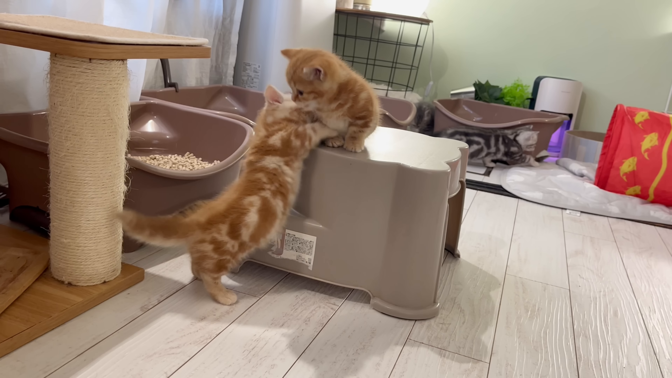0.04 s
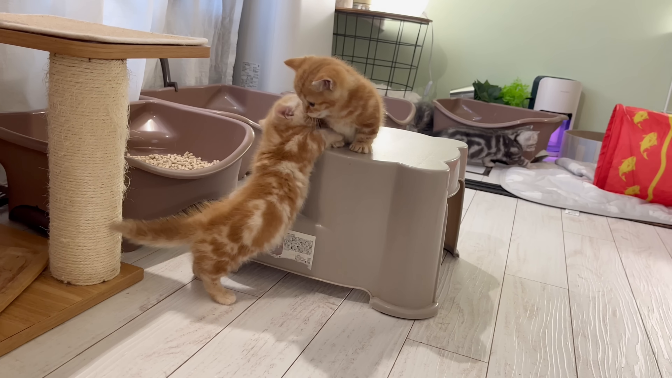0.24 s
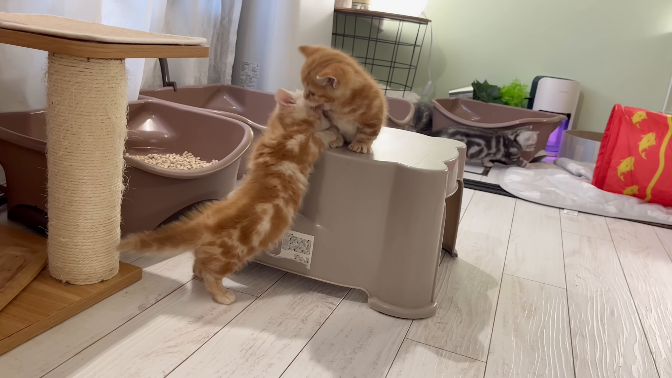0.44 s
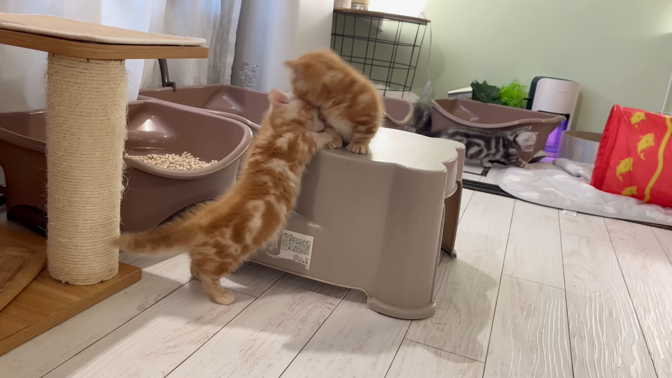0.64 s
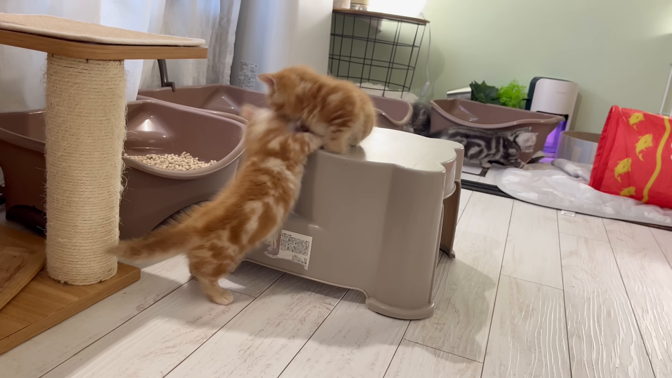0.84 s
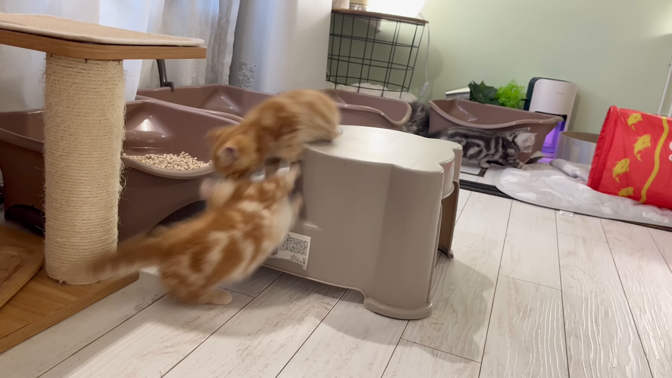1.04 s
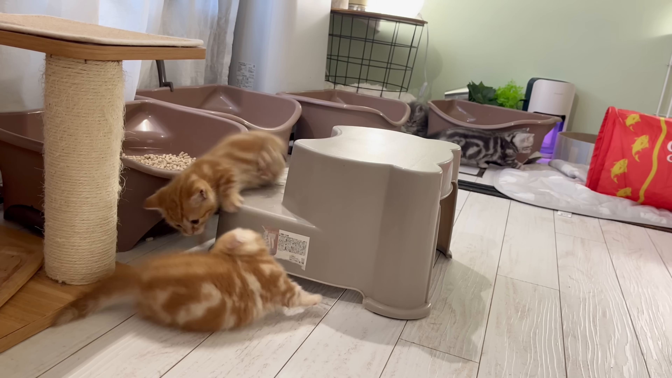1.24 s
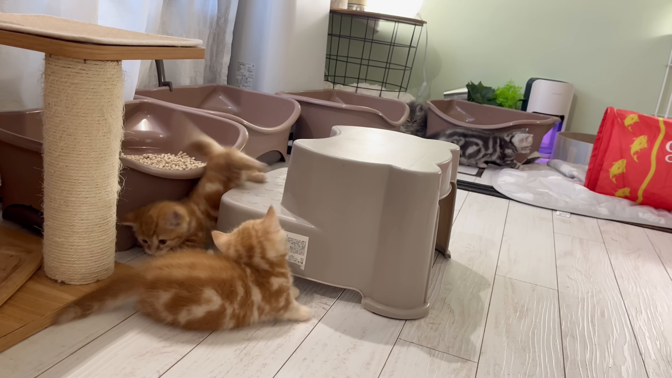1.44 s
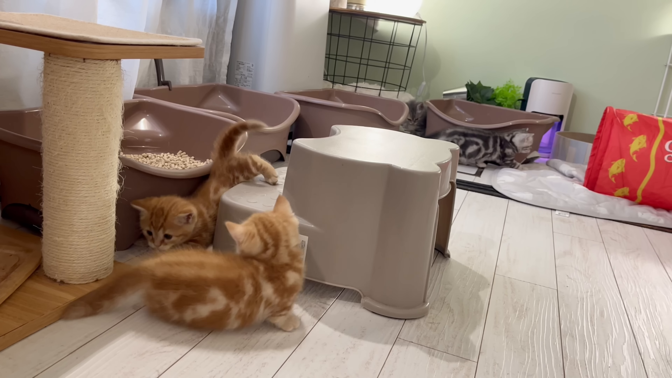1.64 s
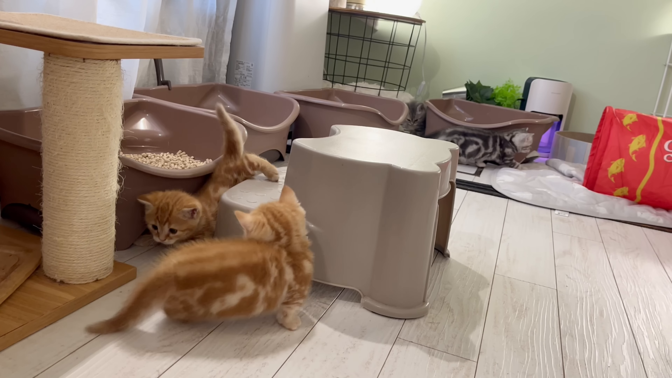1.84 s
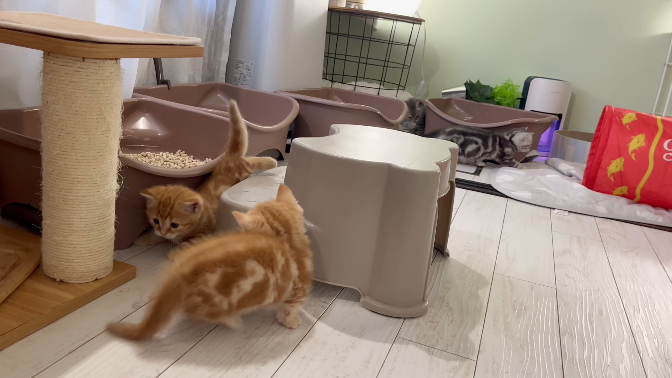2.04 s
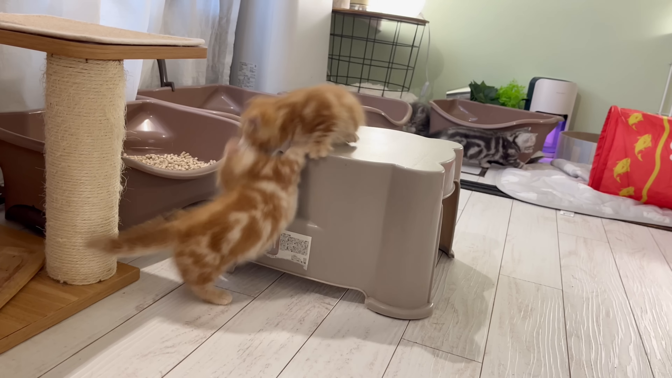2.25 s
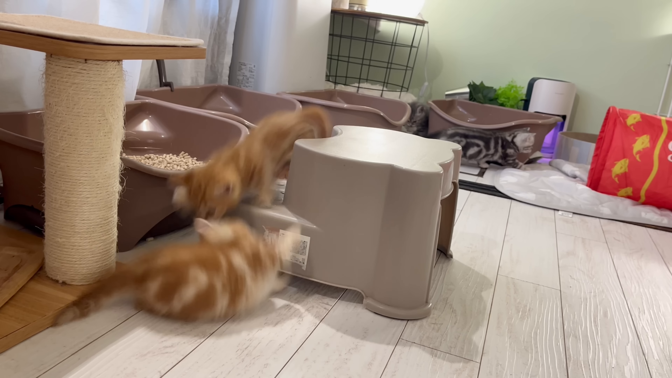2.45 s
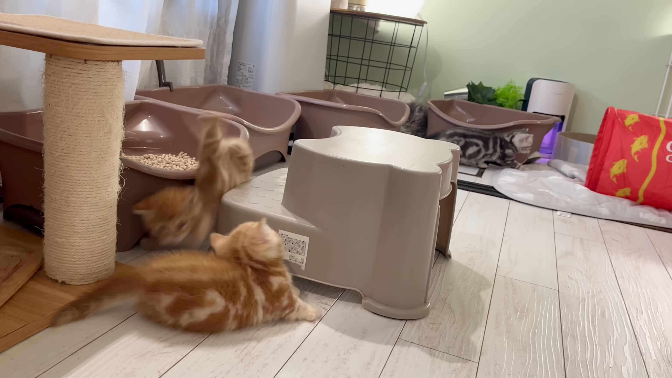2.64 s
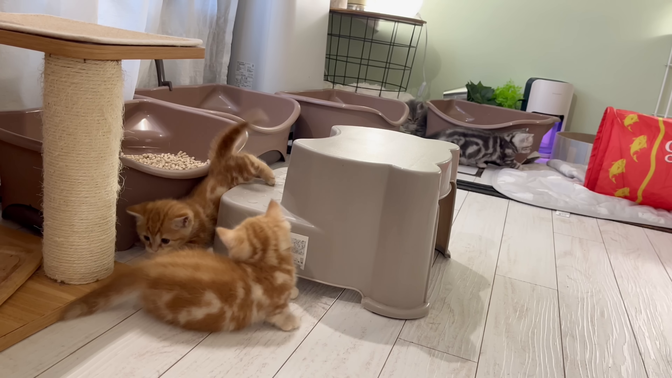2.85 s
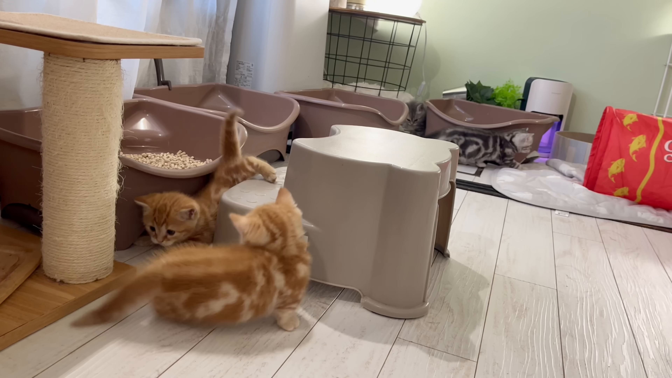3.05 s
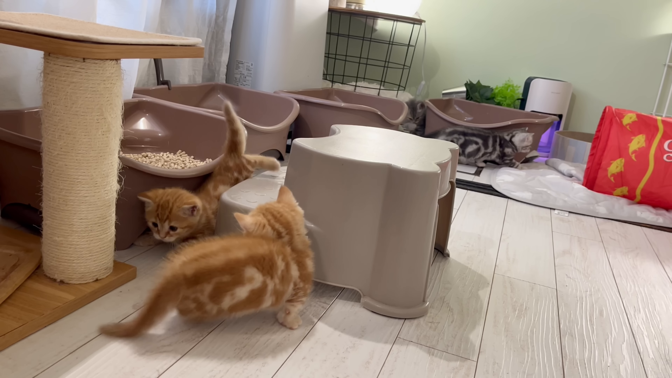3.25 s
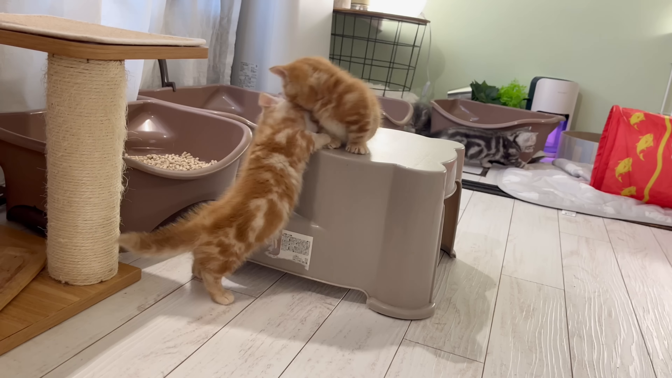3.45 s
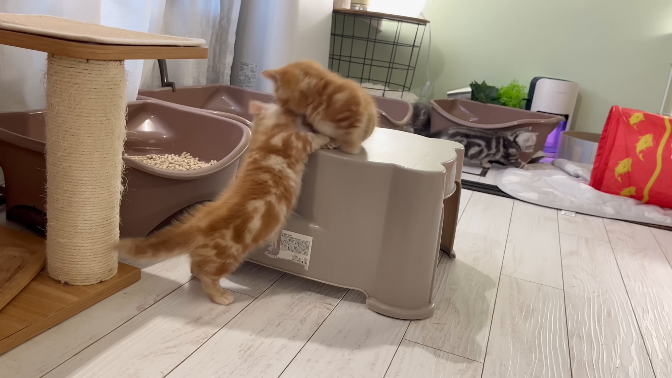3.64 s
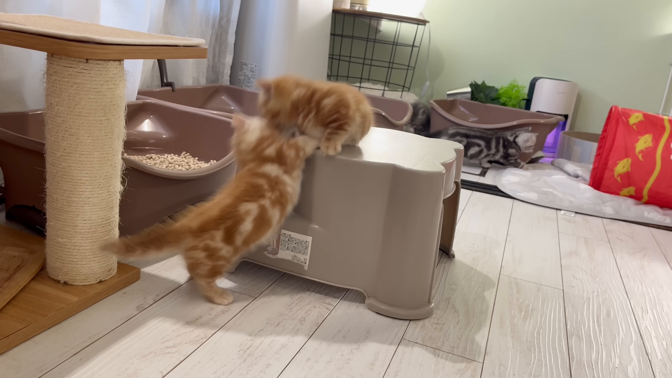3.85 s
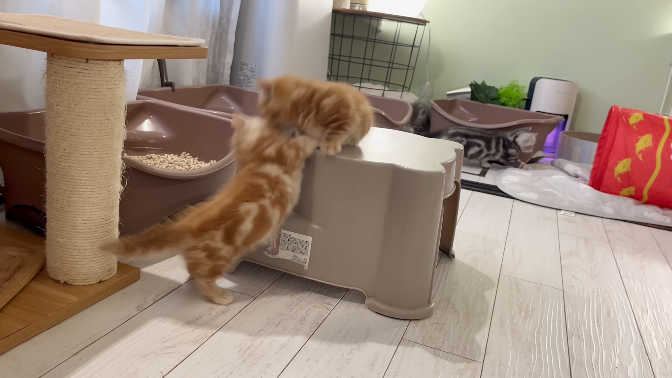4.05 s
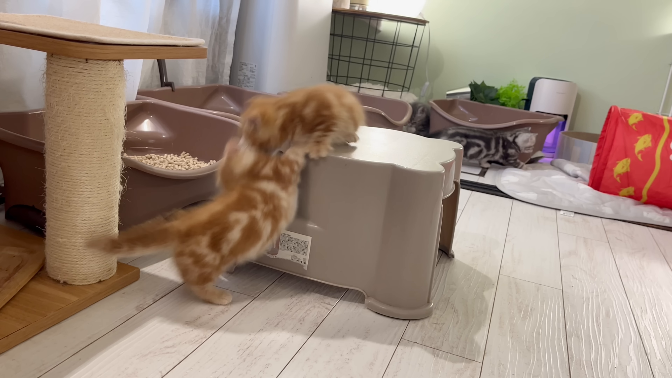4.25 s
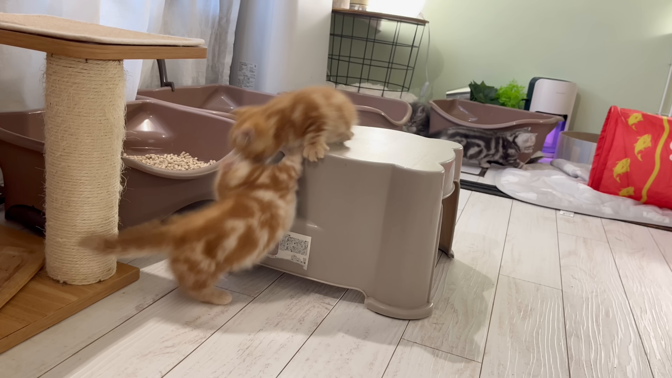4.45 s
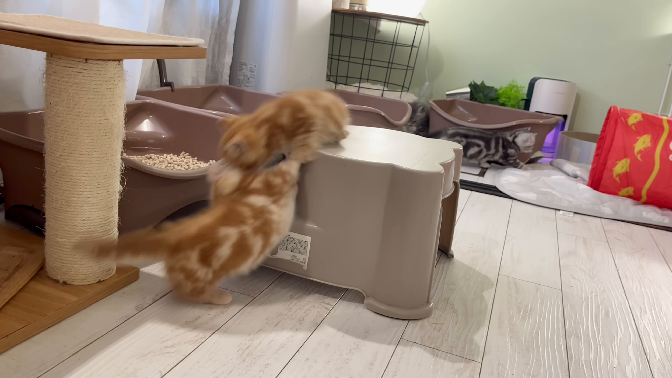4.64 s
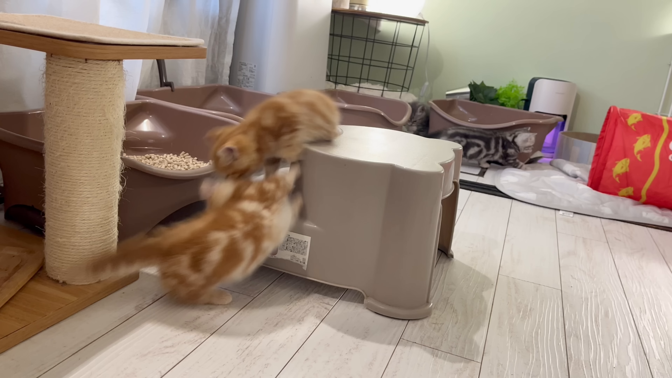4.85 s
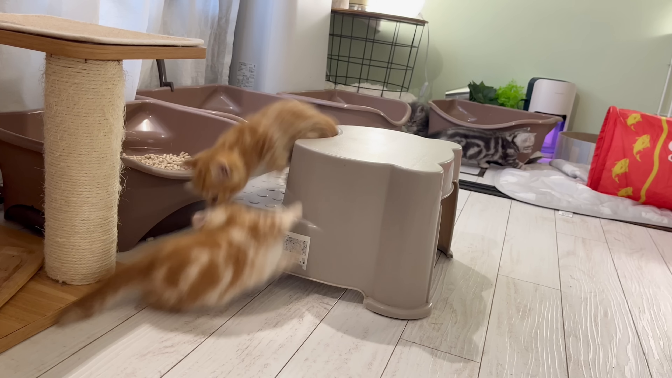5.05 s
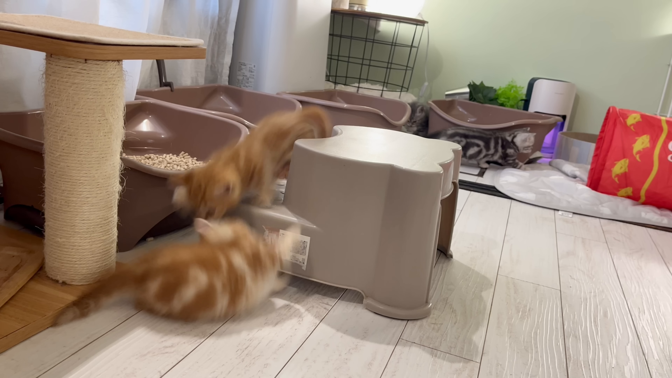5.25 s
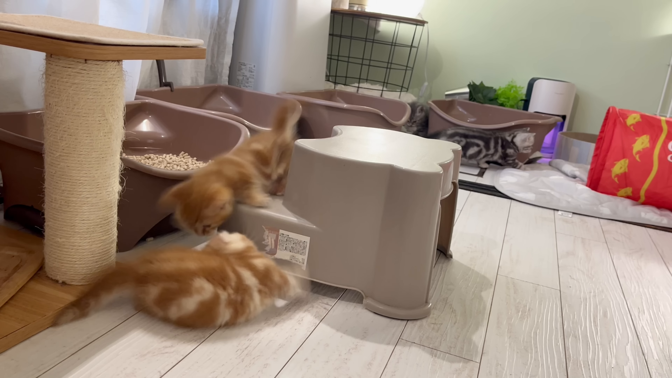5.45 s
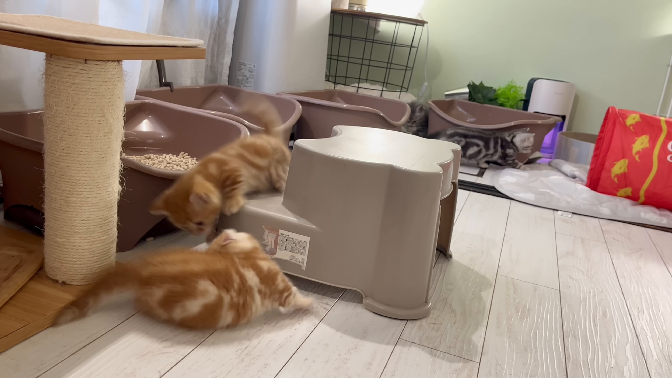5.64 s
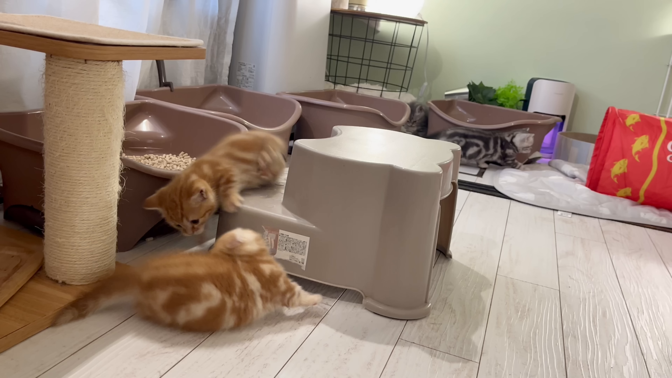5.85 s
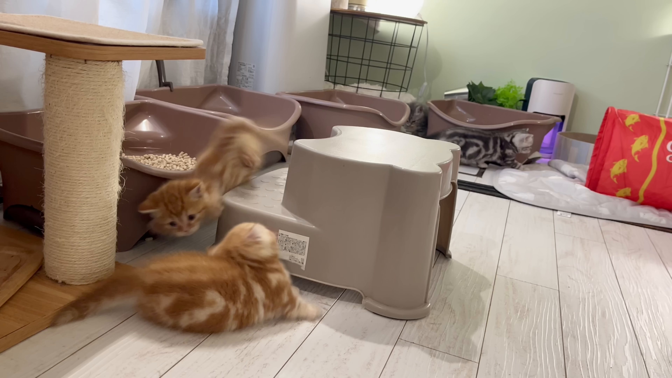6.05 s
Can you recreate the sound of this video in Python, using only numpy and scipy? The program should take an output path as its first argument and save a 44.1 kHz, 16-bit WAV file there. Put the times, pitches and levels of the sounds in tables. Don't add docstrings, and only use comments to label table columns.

```python
import sys
import numpy as np
from scipy import signal
from scipy.fft import rfft, irfft
from scipy.io import wavfile
from scipy.ndimage import uniform_filter1d

SR = 44100
rng = np.random.default_rng(int(sys.argv[2]) if len(sys.argv) > 2 else 0)


def ratio_of_db(decibels):
    return 10 ** (np.asarray(decibels, float) / 20)


def waveform_to_disk(signal):
    frames = np.transpose(np.atleast_2d(signal))
    scaled = np.clip(frames, -1, 1) * 32767
    samples = np.round(scaled).astype(np.int16)
    wavfile.write(sys.argv[1], SR, samples)


N = 269451
M = int(2.2 * SR)
TIME = np.arange(M) / SR
FREQ = np.maximum(np.fft.rfftfreq(M, 1 / SR), 1)


def along(table):
    hz, value = np.transpose(table)
    return np.interp(np.log(FREQ), np.log(np.maximum(hz, 1)), value)


def colour(x, gain):
    return irfft(rfft(x, M) * gain, M)


def unit(x):
    return x / np.sqrt(np.mean(x ** 2))


def swell(start_s, rise_s, t60_s):
    t = np.maximum(TIME - start_s, 0)
    return (1 - np.exp(-2 * t / abs(rise_s))) * 1000. ** (-t / abs(t60_s))


def ring(start_s, hz, rise_s, t60_s):
    return swell(start_s, rise_s, t60_s) * np.sin(2 * np.pi * hz * (TIME - start_s))


def walk(rate):
    k = int(SR / rate)
    return unit(uniform_filter1d(uniform_filter1d(rng.standard_normal(M), k), k))


def air():
    # pitch_hz, level_db (per Hz)
    tone = [(20, -15), (65, 4), (180, -5), (300, -4.5), (590, -4), (800, -10), (1400, -12.5), (2100, -15),
            (2400, -22), (3300, -25), (4800, -55), (7000, -48), (13000, -54), (16000, -72)]
    # pitch_hz, level_db
    side_tone = [(60, -12.5), (300, -11.5), (800, -0.5), (3000, -1.5), (8000, 4), (15000, -33)]
    mid, side = rng.standard_normal((2, M))
    shape = ratio_of_db(along(tone))
    mid = colour(mid, shape)
    side = colour(side, shape * ratio_of_db(along(side_tone)))
    flicker = ratio_of_db(-60 + .5 * walk(7.6))
    return flicker * (mid + side * np.array([[1], [-1]])) / np.std(mid)


def shuffle():
    # time_s, rumble_db
    effort = [(0.0, -82), (.47, -68.5), (.59, -58.5), (.74, -62.5), (.92, -56.5), (1.2, -50), (1.33, -57),
              (1.4, -50), (1.53, -62), (2.12, -90)]
    # pitch_hz, width_hz, level_db
    board_modes = [(45.2, 13, -7.5), (66, 20.2, -5.5), (92, 35, 0.5), (135, 15, -12), (184.4, 65, -10.5),
                   (255, 39, -11), (328, 130, -16)]
    # pitch_hz, level_db
    slide = [(500, 9.5), (1200, 9), (2500, 1), (4500, 1), (7000, -13.5), (12000, -8.5), (16000, -5.5)]
    rest_db, top_db, growth = -78.5, -60, 2.5
    effort_db = np.interp(TIME, *np.transpose(effort))
    boards = sum(ratio_of_db(db) / (1 + (2 * (FREQ - hz) / width) ** 2) for hz, width, db in board_modes)
    rumble = unit(colour(rng.standard_normal(M), boards)) * ratio_of_db(effort_db + 1.1 * walk(33))
    hiss_level = ratio_of_db(rest_db) + ratio_of_db(top_db + growth * (effort_db - effort_db.max()))
    hiss = unit(colour(rng.standard_normal(M), ratio_of_db(along(slide))))
    return rumble + hiss * hiss_level * ratio_of_db(2.5 * walk(39))


def paws():
    # start_s, peak_db, pitch_hz
    taps = [(.168, -59, 430), (.53, -52, 700), (.768, -52, 590), (.862, -48, 260), (.902, -43.5, 320),
            (.94, -40, 788), (.98, -36, 265), (1.03, -49, 255), (1.119, -57, 361), (1.157, -32, 350),
            (1.159, -37.5, 640), (1.205, -34.5, 885), (1.24, -44, 260), (1.2925, -33, 790),
            (1.294, -41, 660), (1.3, -43, 285), (1.378, -38.5, 795), (1.405, -32.5, 820),
            (1.42, -42.5, 700), (1.485, -44.5, 557), (1.589, -44.5, 494)]
    # start_s, peak_db, pitch_hz, t60_s
    thumps = [(.137, -48.5, 106, .072), (.39, -46, 66.5, .095), (.562, -50, 135, .15),
              (.62, -48.5, 155, .27), (.7, -50, 70, .1), (.758, -54, 68, .15), (.837, -48, 68.4, .32),
              (.894, -44, 69.4, .17), (.987, -39.5, 92, 0.12), (.999, -39, 62.6, .13),
              (1.099, -52, 75.5, 0.19), (1.189, -18, 82, 0.082), (1.198, -25, 66, .22),
              (1.214, -20, 125.8, .06), (1.224, -36, 193, .12), (1.262, -34.5, 85, 0.34),
              (1.395, -36, 100, .12), (1.417, -32, 110, .074), (1.436, -36, 200, .07), (1.44, -33, 105, .1),
              (1.46, -32, 72, .15), (1.508, -44, 100, 0.14), (1.621, -47.5, 82, .072)]
    out = 0
    for s, db, hz in taps:
        t60 = .008 + 6.5 / hz
        wall = ring(s, hz, 0.92 / hz, t60)
        neighbour = .5 * ring(s, 1.37 * hz, 0.0013, 0.46 * t60)
        overtone = 0.14 * ring(s, 2.2 * hz, 0.0032, 0.86 * t60)
        out = out + ratio_of_db(db) * (wall + neighbour + overtone)
    for s, db, hz, t60 in thumps:
        out = out + ratio_of_db(db) * ring(s, hz, .7 / hz, t60)
    return out


def shell(push, damping, ring_db):
    wall_hz = [1247, 1744, 1864, 2068, 2222, 2470, 2614, 2741, 3100, 3635, 4192, 4575, 4682, 4829, 5050,
               5720, 6460]
    # level_db, t60_s
    wall_modes = [(-19.5, 0.1), (-16, .06), (-9, 0.039), (-3.5, 0.055), (-4, 0.025), (-13, 0.037),
                  (-8, 0.028), (-12, 0.08), (-9, 0.028), (-12, 0.08), (-31, 0.075), (-2.5, 0.031),
                  (-4.5, 0.078), (-8.5, 0.067), (-10, 0.0639), (-16.5, 0.081), (-10.5, 0.019)]
    reply = 0
    for k, (hz, (db, t60)) in enumerate(zip(wall_hz, wall_modes)):
        reply = reply + (-1) ** k * ratio_of_db(db) * ring(0, hz, 0.00027, t60 * damping)
    return ratio_of_db(ring_db) * signal.fftconvolve(push, reply[:SR // 4])[:M]


def claws():
    # start_s, peak_db, centre_hz, t60_s
    skids = [(.869, -54, 3000, .035), (.876, -40, 3700, 0.053), (.9, -51, 3760, 0.32),
             (.957, -45.5, 1660, 0.057), (1.077, -52, 4500, .041), (1.107, -46, 2900, .079),
             (1.118, -41, 5000, .045), (1.123, -39, 4500, .032), (1.377, -53, 3800, .02),
             (1.402, -41.5, 4600, .035), (1.421, -45, 2550, .04), (1.431, -47, 1350, 0.35),
             (1.441, -45.5, 2390, .042), (1.454, -50, 2740, .13), (1.497, -47, 3200, .03),
             (1.521, -50.5, 1880, .079)]
    # centre_hz, relative_width, peak_db
    squeak = [(1440, .23, -48.5), (2640, 0.059, -47), (3500, .2, -45), (5050, 0.049, -47)]
    bands = [(s, db, hz, 0.35 + .22 * hz / 1000, t60) for s, db, hz, t60 in skids]
    bands += [(.874, db, hz, width, 0.063) for hz, width, db in squeak]
    fizz = ratio_of_db(-24.0) * np.clip(FREQ / 9000, 0, 1) ** 3
    out = 0
    for s, db, hz, width, t60 in bands:
        grit = rng.standard_normal(M) * ratio_of_db(2.2 * rng.exponential(size=M))
        resonance = 1 / (1 + ((FREQ / hz - hz / FREQ) / width) ** 2)
        scrape = unit(colour(grit, resonance + width ** 2 * fizz))
        rise = 0.071 * t60
        out = out + ratio_of_db(db - 4.5) * swell(s - rise, rise, t60) * scrape
    return out + shell(out, damping=0.66, ring_db=-38.5)


def blows():
    # start_s, peak_db, last_hz, t60_s
    hits = [
        (.979, -39, 94, .11),
        (1.1797, -23, 179, 0.019),
        (1.386, -36, 94, 0.13),
    ]
    span_hz, fall_s = 270.5, .006
    out = 0
    for s, db, last_hz, t60 in hits:
        t = np.maximum(TIME - s, 0)
        cycles = last_hz * t + span_hz * fall_s * (1 - np.exp(-t / fall_s))
        out = out - ratio_of_db(db) * swell(s, 0.0027, t60) * np.sin(2 * np.pi * cycles)
    return out


def slam():
    # start_s, peak_db, top_hz
    hits = [
        (1.1747, -26.5, 16000),
        (1.1756, -27, 9600),
        (1.1774, -21, 6120),
        (1.1829, -23.5, 4740),
        (1.1855, -37.5, 5000),
        (1.187, -28.5, 4500),
    ]
    # pitch_hz, level_db
    loose_rim = [(700, -33), (1600, -14), (2400, -8), (3500, 7.5), (4700, 3.5), (6000, -6), (9000, -25),
                 (16000, -13)]
    # pitch_hz, level_db, t60_s
    hollow = [(256, -0.5, 0.079), (373.5, -5.5, 0.049), (419.4, 2, 0.035), (483, -8, 0.018),
              (567, -1.5, 0.016), (645.6, 0, 0.04), (700, -1, 0.035), (841, -7.5, 0.024)]
    bare, rattle = rng.standard_normal((2, M))
    bright = np.clip(FREQ / 1600, 0, 1) ** 2
    crack, push = 0, 0
    for s, db, top_hz in hits:
        burst = swell(s, .0001, 0.0042) * bare
        crack = crack + ratio_of_db(db) * colour(burst, bright / (1 + (FREQ / top_hz) ** 2))
        push = push + ratio_of_db(db) * (np.arange(M) == round(s * SR))
    walls = shell(push, damping=.6, ring_db=-12)
    chatter = ratio_of_db(2.2 * walk(300)) * swell(hits[2][0], 0.0098, 0.1)
    trail = ratio_of_db(-35.5) * colour(chatter * rattle, ratio_of_db(along(loose_rim)))
    boom = sum(ratio_of_db(db) * ring(1.1785, hz, 0.0031, t60) for hz, db, t60 in hollow)
    return ratio_of_db(4.5) * crack + walls + trail + ratio_of_db(-27) * boom


def room(x, wet_db):
    # pitch_hz, t60_s
    decay = [(80, 0.35), (500, 0.45), (2000, 0.27), (8000, 0.3)]
    tail = np.zeros((2, M))
    hz_t, t60_t = np.transpose(decay)
    for hz in 79.0 * 2 ** np.arange(9):
        band = np.exp(-2 * np.log2(FREQ / hz) ** 2)
        t60 = np.interp(np.log(hz), np.log(hz_t), t60_t)
        tail += colour(rng.standard_normal((2, M)), band) * swell(0.0049, 0.0013, t60)
    tail = tail[:, :SR // 2] / np.sqrt(np.sum(tail[0] ** 2))
    return ratio_of_db(wet_db) * signal.fftconvolve(x[None], tail, axes=1)[:, :M]


def ports(x):
    # pitch_hz, level_db
    mic = [(30, 3), (200, 2), (1200, 0), (3000, 2), (5500, -2), (7100, -0.5), (8000, -2.5), (9800, -1),
           (12500, -7), (15000, -6), (15900, -9), (16500, -40)]
    # pitch_hz, level_db
    left_over_right = [(60, .6), (110, 1), (200, 1.2), (380, 1), (700, 2.5), (1290, 2.5), (2380, 4),
                       (4400, 12.5), (8120, 2.5), (15000, 2.5)]
    # pitch_hz, phase_rad
    left_lead = [(300, 0), (4500, .5), (6300, -.5), (7800, -2.8), (9400, -3.5), (10700, -6), (13200, -6.7),
                 (14100, -8.7), (16000, -10.4)]
    half = ratio_of_db(along(left_over_right) / 2) * np.exp(.5j * along(left_lead))
    return colour(x, ratio_of_db(along(mic)) * np.array([half, 1 / half]))


def replay(take):
    nudge_ms = [0, 2.1, -12.3, 2.7, 1.2, 6.4, -9.2, .5, -6.9, 8.8, -2.3, 7.1, 12.35, 4.2, 12.3, -8.95, 5.8,
                -2.75, 12.3, 2.4, .15, 3.3, 3.6]
    slow_s, slow_from_s, slow_speed = 3.4145, .82654, .2
    elapsed = .1192 * np.arange(len(nudge_ms))
    starts = np.r_[2.115, slow_s + elapsed]
    slow_backs = slow_s - slow_from_s + (1 - slow_speed) * elapsed + np.array(nudge_ms) / 1000
    backs = np.r_[1.30054, slow_backs]
    fades = np.r_[1 / SR, np.full(len(elapsed), .008)]
    i = np.arange(N)
    out = take[:, np.minimum(i, M - 1)]
    for start, back, fade in zip(starts, backs, fades):
        share = np.clip((i / SR - start) / fade, 0, 1)
        piece = take[:, np.clip(i - round(back * SR), 0, M - 1)]
        out = (1 - share) * out + share * piece
    return out


def scene():
    # pitch_hz, level_db
    room_feed = [(60, -14.5), (200, -8), (700, -3.5), (2000, 0.5), (16000, -4)]
    # pitch_hz, level_db
    wide = [(60, -3.5), (150, 2), (300, -5), (900, 1), (4000, -2.5), (9000, -6), (16000, -32)]
    near = shuffle() + paws() + claws() + blows() + slam()
    same, apart = room(colour(near, ratio_of_db(along(room_feed))), wet_db=-3)
    spread = colour(apart, ratio_of_db(along(wide))) * np.array([[1], [-1]])
    return replay(ports(near + same) + spread + air())


def top_cut(x):
    return signal.sosfilt(signal.butter(12, 16340, fs=SR, output="sos"), x)


def record(dry):
    return top_cut(dry)


dry = scene()
out = record(dry)
waveform_to_disk(out)
```